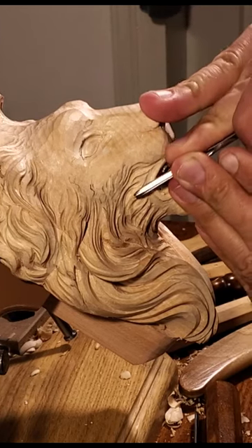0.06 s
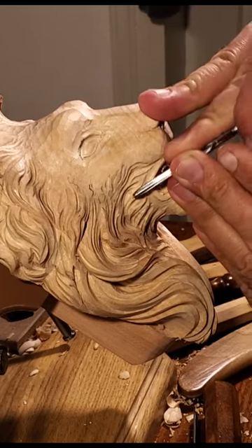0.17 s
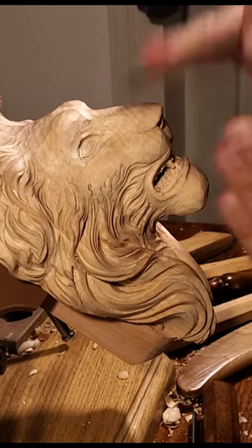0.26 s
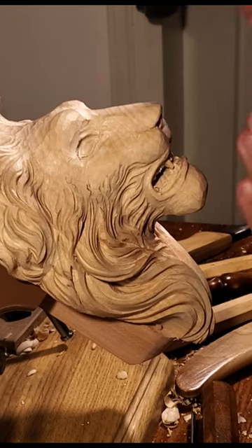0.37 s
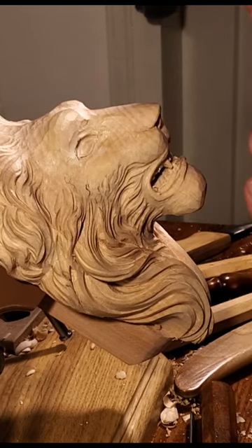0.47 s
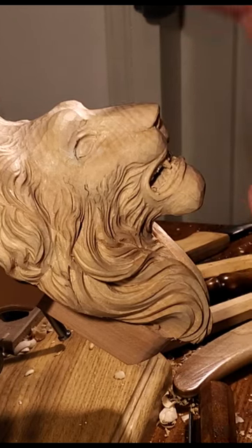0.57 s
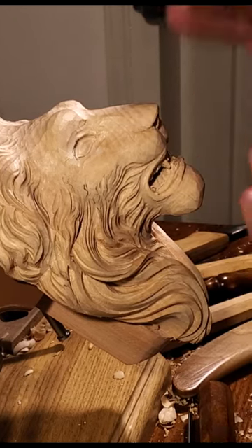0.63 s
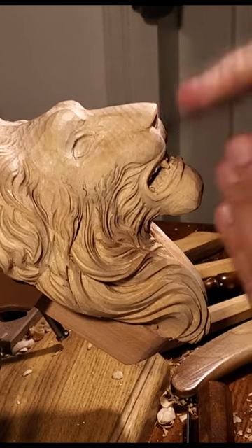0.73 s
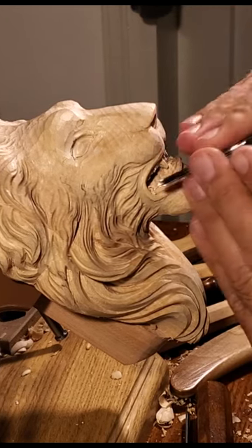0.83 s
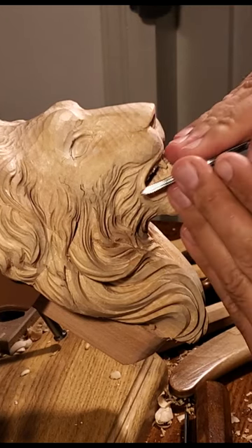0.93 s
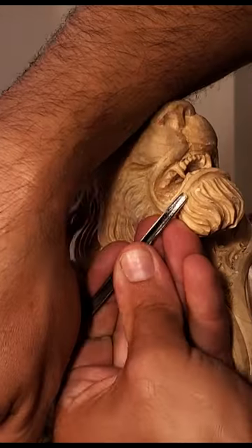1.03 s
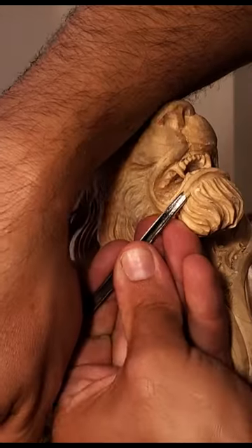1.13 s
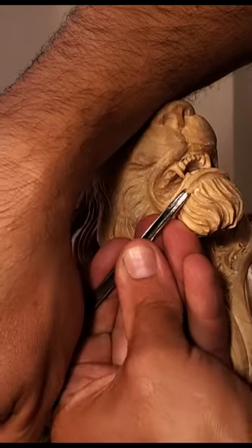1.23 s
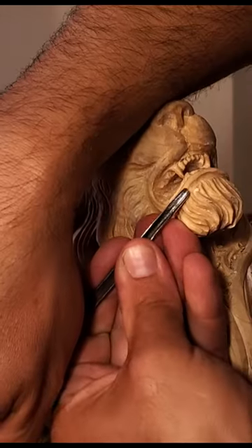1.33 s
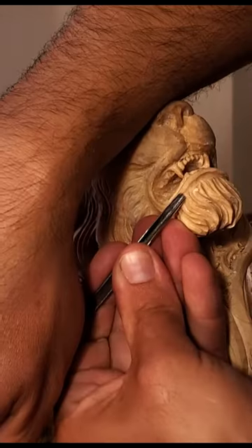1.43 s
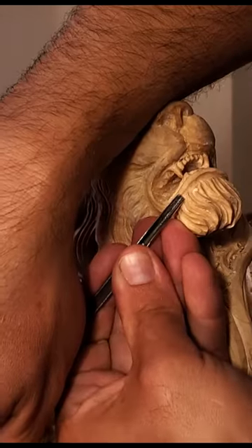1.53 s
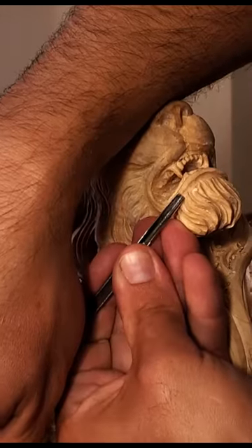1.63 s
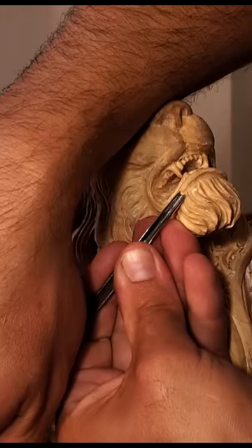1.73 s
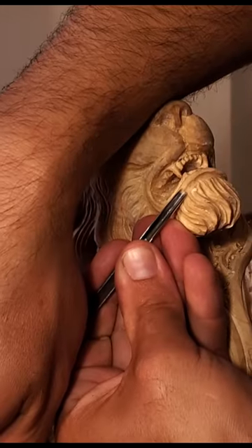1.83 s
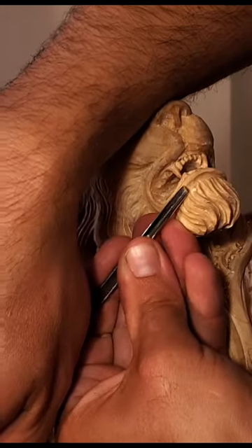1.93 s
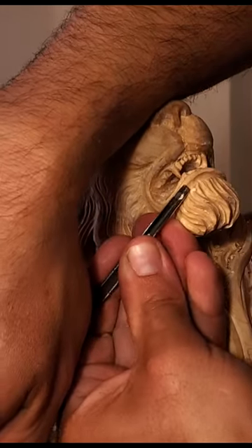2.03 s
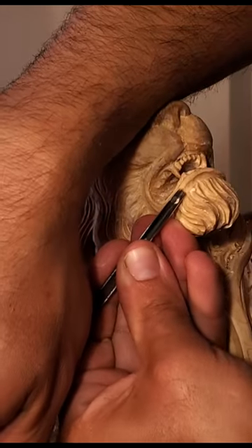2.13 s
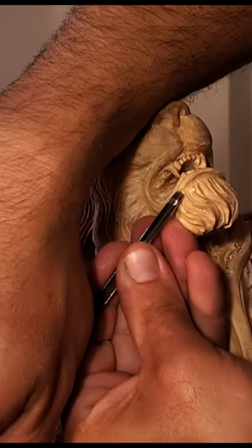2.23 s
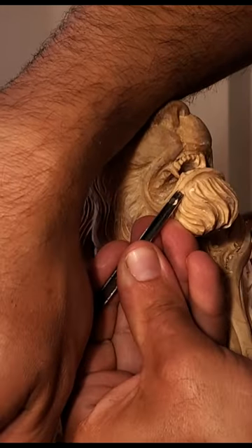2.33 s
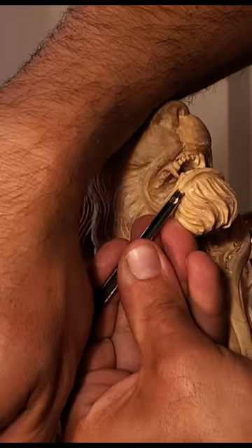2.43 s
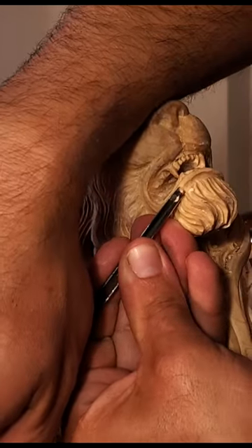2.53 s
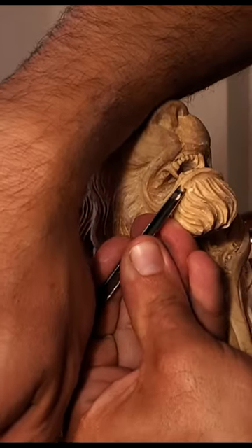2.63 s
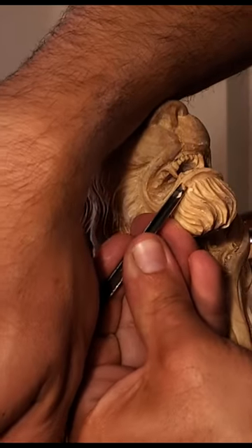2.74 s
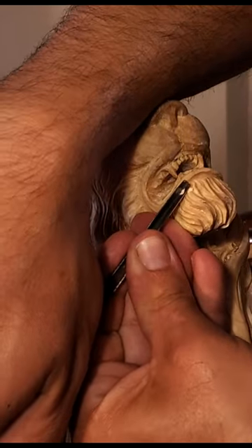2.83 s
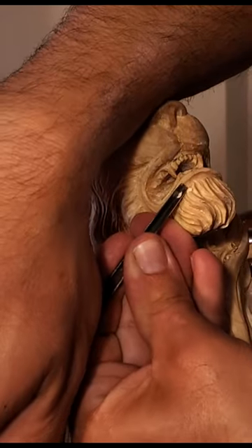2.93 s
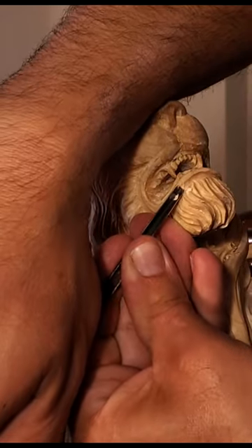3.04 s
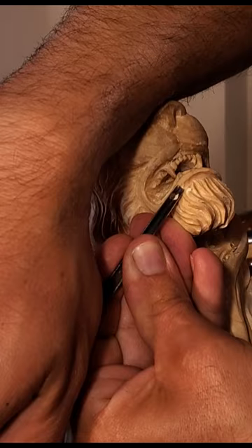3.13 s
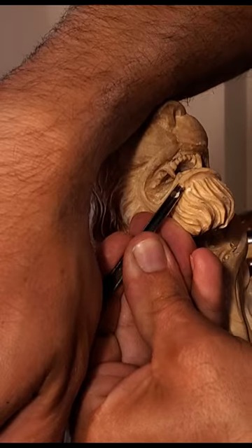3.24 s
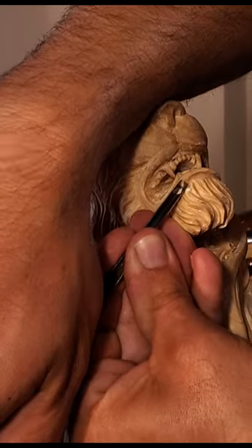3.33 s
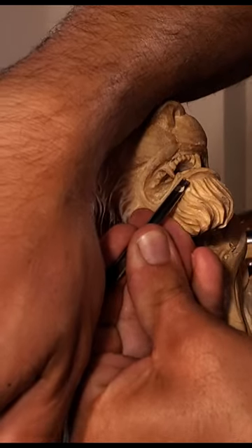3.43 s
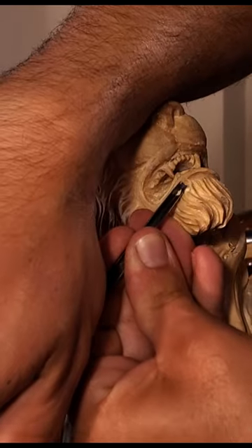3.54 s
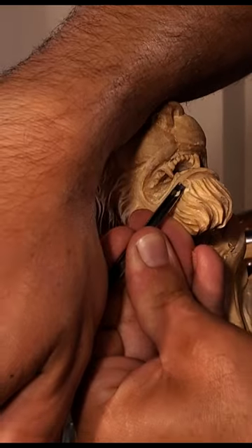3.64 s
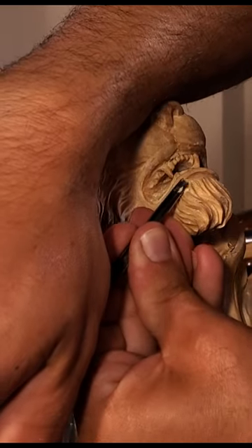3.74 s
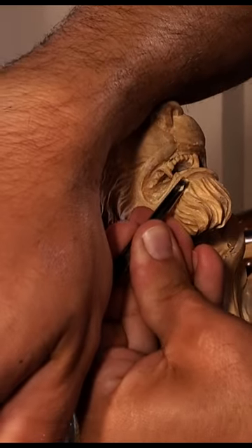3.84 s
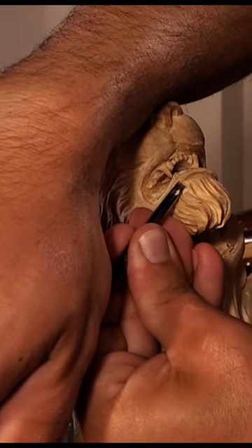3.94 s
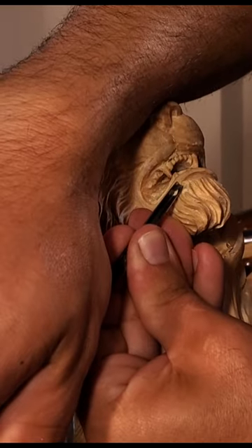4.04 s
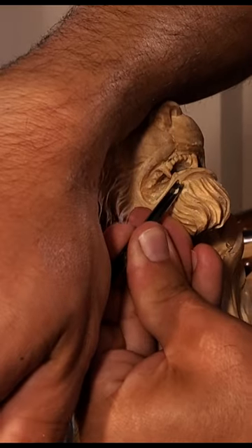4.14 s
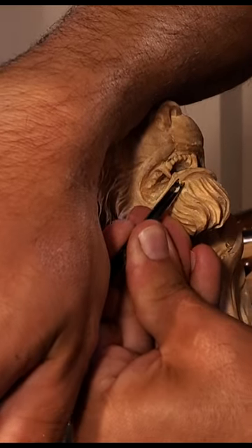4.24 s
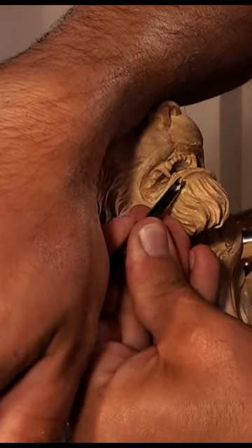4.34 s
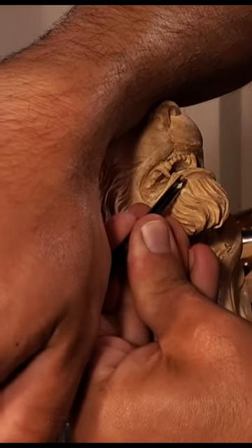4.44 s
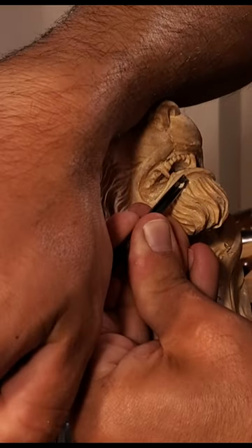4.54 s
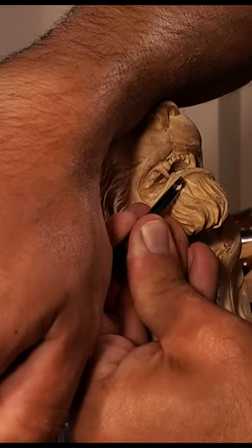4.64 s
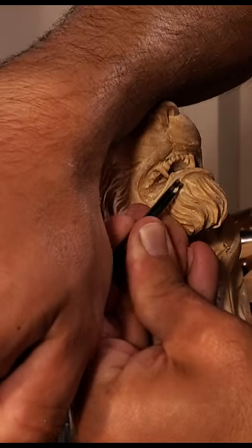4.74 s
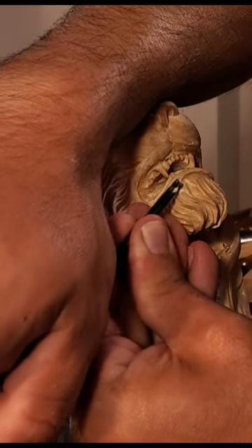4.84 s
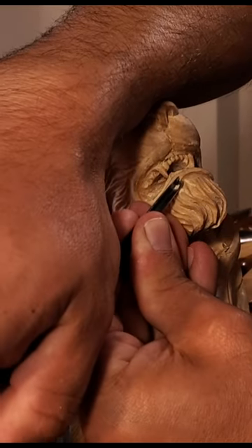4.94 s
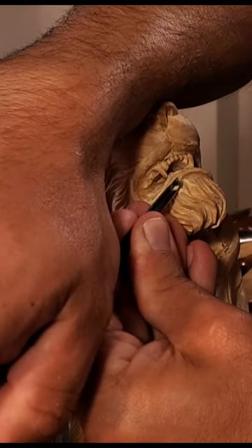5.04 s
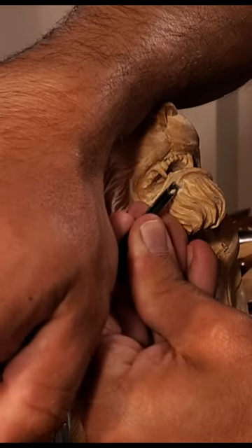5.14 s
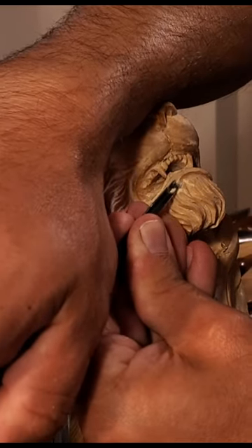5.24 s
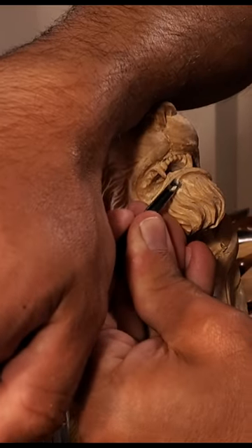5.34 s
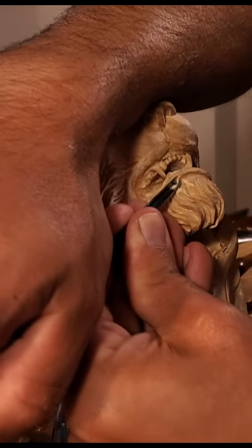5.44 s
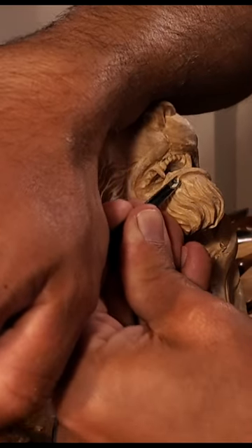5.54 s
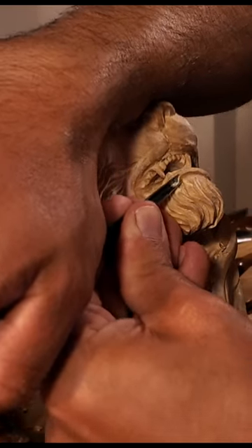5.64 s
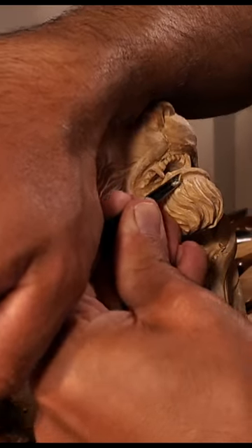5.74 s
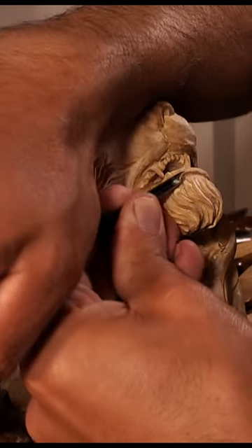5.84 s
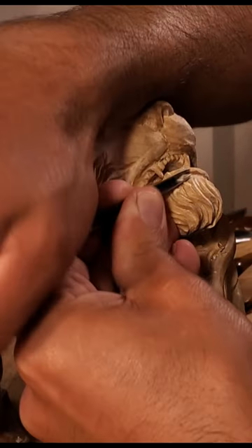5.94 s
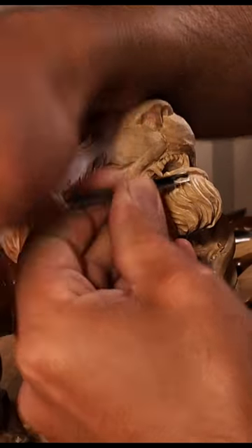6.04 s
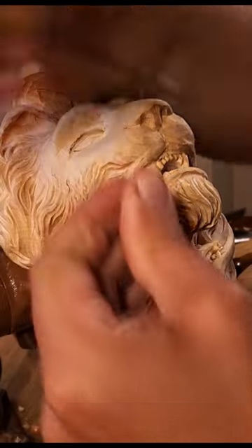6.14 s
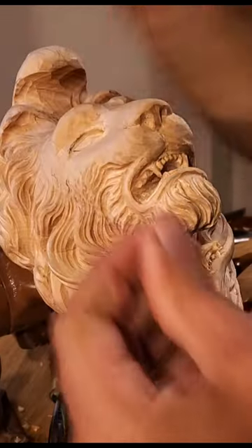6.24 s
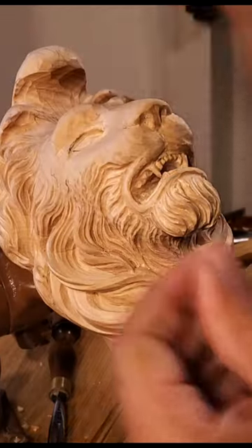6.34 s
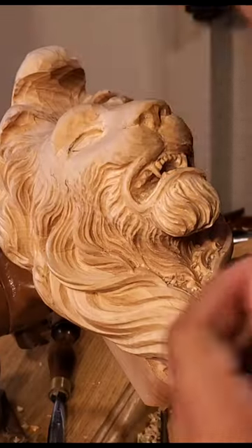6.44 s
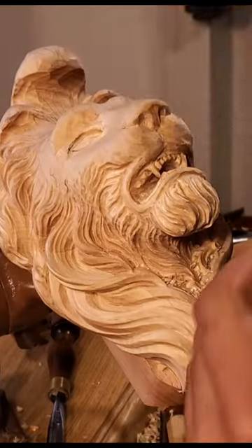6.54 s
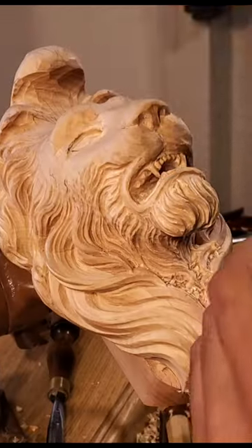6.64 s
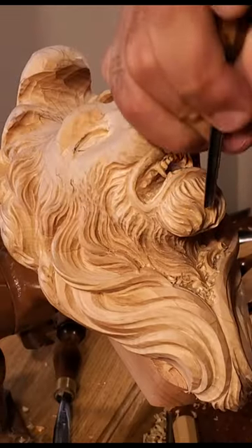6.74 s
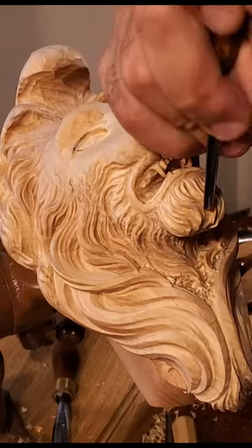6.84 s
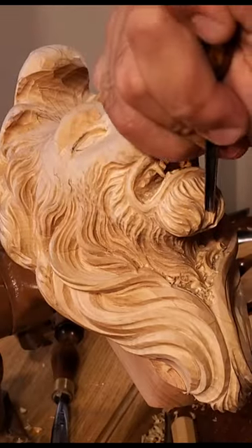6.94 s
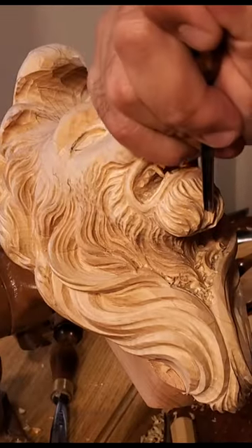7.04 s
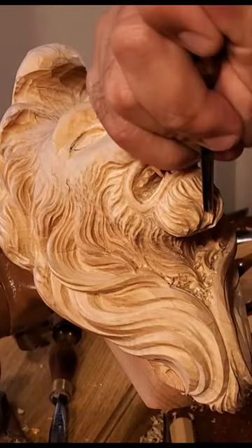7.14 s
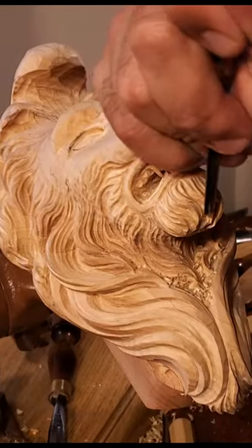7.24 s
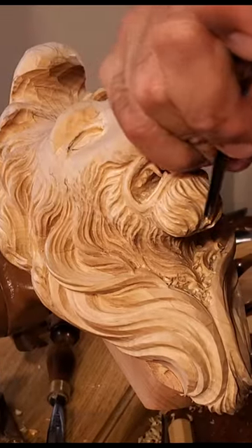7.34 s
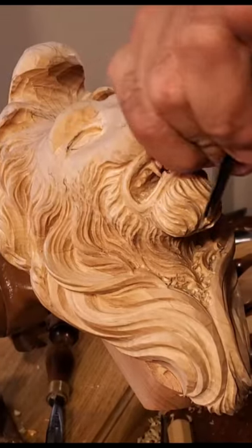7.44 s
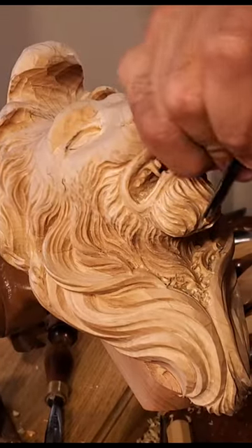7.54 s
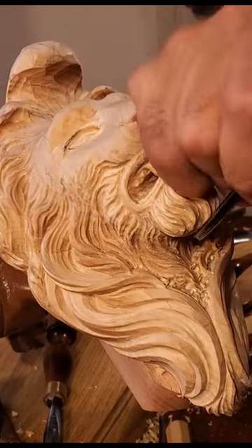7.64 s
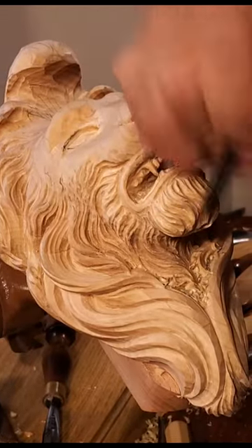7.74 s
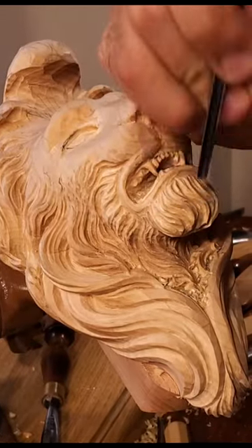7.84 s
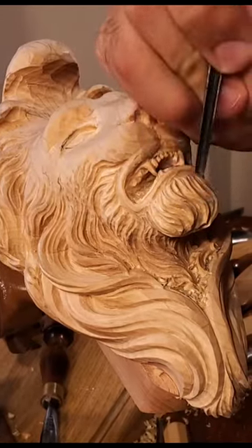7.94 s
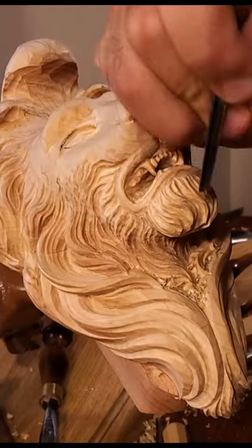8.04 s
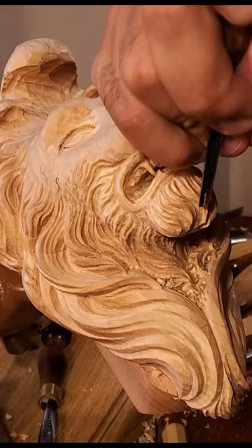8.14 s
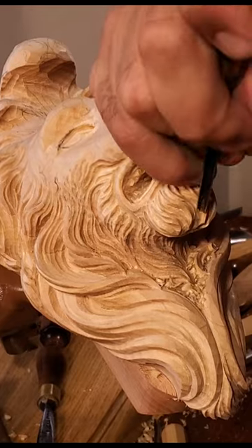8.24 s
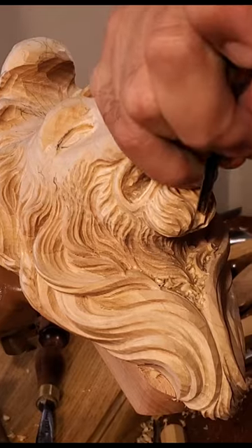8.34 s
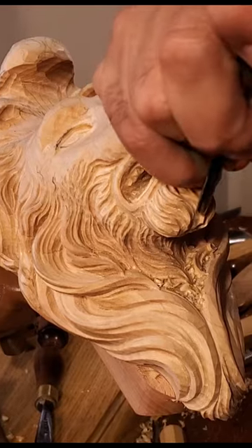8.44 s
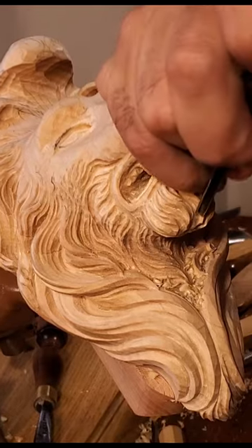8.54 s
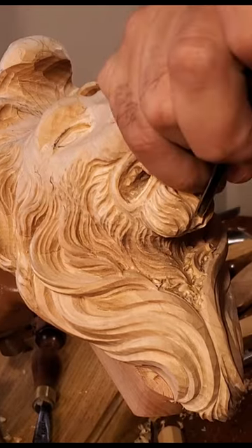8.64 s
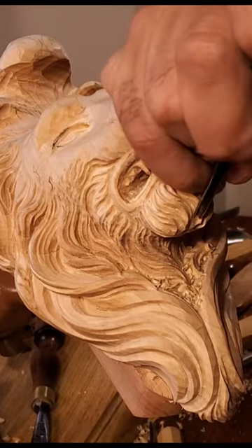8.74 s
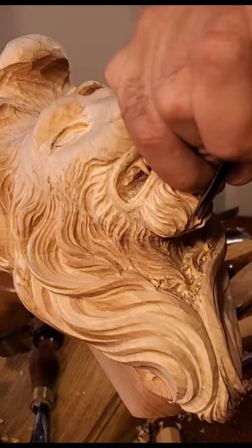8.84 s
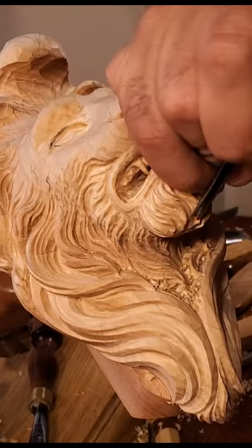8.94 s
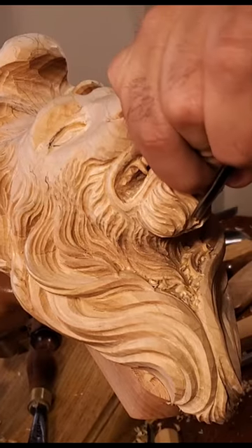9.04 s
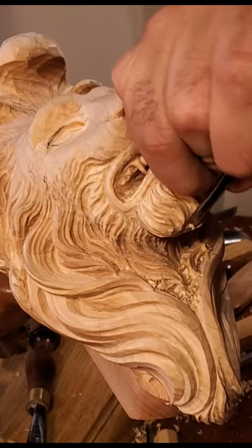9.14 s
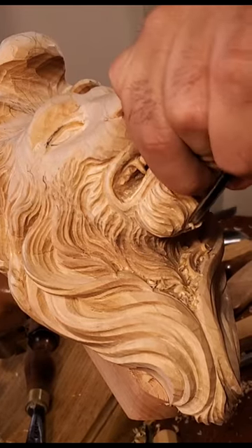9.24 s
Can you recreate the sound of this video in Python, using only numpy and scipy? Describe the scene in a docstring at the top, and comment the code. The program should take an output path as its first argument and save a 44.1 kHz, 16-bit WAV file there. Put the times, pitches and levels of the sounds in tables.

```python
"""A small steel gouge carves a wooden figure clamped on a workbench, close up in a small room, in mono.
Each cut tears a dense run of fibres that ring blade and block and set the bench quivering.
Hands nudge the figure, then the gouge pares it lying flat. After a pause with a brush of the hand
and a few light taps, it is held upright and bites with a brighter crunch."""
import sys
import numpy as np
from scipy import signal
from scipy.fft import rfft, irfft, next_fast_len
from scipy.io import wavfile
from scipy.ndimage import uniform_filter1d, map_coordinates

SR = 44100
rng = np.random.default_rng(int(sys.argv[2]) if len(sys.argv) > 2 else 0)


def master(y):
    """Save y as 16-bit WAV."""
    cut = np.clip(np.atleast_2d(y).T, -1, 1)
    pcm = np.round(cut * 32767)  # scale
    wavfile.write(sys.argv[1], SR, pcm.astype(np.int16))


N = 409688
REGRIP_S = 6.8  # flat grip before, upright after

# Block spectrum, flat grip. Each row: frequency in Hz, gain in dB.
FLAT_BLOCK = [(68, -25), (115, -8.5), (140, 0.5), (231, -13.5), (269, -2), (350, -17), (383, -6),
              (480, -16.5), (550, -7), (602, -11), (1000, -20.5), (1300, -51), (2200, -120)]
# Block and bench resonances, flat grip. Each row: frequency in Hz, width in Hz, gain in dB.
FLAT_BLOCK_MODES = [(137.9, 9.6, 8.5), (208, 13, 10.5), (270.7, 12.6, 5.5), (319, 21, 3), (370, 13, 7.5),
                    (529, 19, 4), (795, 115, 7)]
# Tough fibres giving way. Each row: time in seconds, relative level in dB.
SNAPS = [(1.698, -39), (1.886, -28.5), (1.973, -38), (2.454, -36), (2.5645, -31.5), (2.7577, -39),
         (2.8193, -39), (3.256, -36), (3.3869, -33), (4.19, -34), (4.2979, -34), (5.694, -25),
         (5.7158, -25.5), (5.8543, -31), (5.9058, -30), (7.222, -47), (7.2758, -30), (7.637, -24.5),
         (7.6546, -21), (9.148, -24.5)]


def amp(db):
    """Decibels to gain."""
    return 10 ** (np.asarray(db) / 20)


def unit(x):
    """Scale to rms 1."""
    return x / np.sqrt(np.mean(x ** 2) + 1e-20)


def steady(x, size=2600):
    """Hold the running rms at 1 over size samples."""
    return x / np.sqrt(np.abs(uniform_filter1d(x ** 2, size=size)) + 1e-12)


def along(points, hz):
    """Interpolate (Hz, value) points on a log axis."""
    points_hz, values = np.transpose(points)
    return np.interp(np.log(hz + 1), np.log(points_hz), values)


def wobble(knots_per_s):
    """Smooth random curve."""
    place = np.arange(N) * knots_per_s / SR
    knots = rng.standard_normal(int(place[-1]) + 4)
    return np.interp(place, place[::32], map_coordinates(knots, [place[::32]]))


def colour(spectrum, hz):
    """Gain of (Hz, dB) points, falling steeply beyond their ends."""
    outside = np.minimum(hz / spectrum[0][0], 1) * np.minimum(spectrum[-1][0] / (hz + 1), 1)
    return amp(along(spectrum, hz)) * outside ** 4


def peaks(modes, hz):
    """Gain of narrow resonances."""
    return sum(amp(db) / (1 + ((hz - mode_hz) / width_hz) ** 2) ** 2 for mode_hz, width_hz, db in modes)


def ring(gain, size=16384):
    """Minimum-phase impulse response of energy 1, shaped by gain(hz)."""
    hz = np.fft.rfftfreq(size, 1 / SR)
    cepstrum = irfft(np.log(np.maximum(gain(hz), 1e-6)))
    cepstrum[1:size // 2] *= 2
    cepstrum[size // 2 + 1:] = 0
    response = irfft(np.exp(rfft(cepstrum)))
    return response / np.linalg.norm(response)


def through(x, response):
    """Convolve, cut to N samples."""
    return signal.oaconvolve(x, response)[:N]


def noise(spectrum, size=N):
    """Noise coloured by (Hz, dB) points."""
    return through(rng.standard_normal(size), ring(lambda hz: colour(spectrum, hz)))[:size]


def burst(t60_s, size=6000):
    """Puff of contact noise, energy 1."""
    fall = amp(-60 * np.arange(size) / SR / t60_s)
    puff = rng.standard_normal(size) * fall * (1 - fall ** 3)
    return puff / np.linalg.norm(puff)


def add(track, start_s, sound):
    """Mix a sound into a track."""
    span = track[round(start_s * SR):][:len(sound)]
    span += sound[:len(span)]


def in_room(x, wet_db):
    """Direct sound plus a diffuse tail whose treble dies first."""
    # Each row: frequency in Hz, t60 in seconds.
    decay = [(100, 1), (500, 0.27), (2000, 0.35), (6000, 0.28), (14000, 0.15)]
    hz, t, bins = signal.stft(rng.standard_normal(SR // 2), SR, nperseg=256)
    tail = signal.istft(bins * amp(-60 * t / along(decay, hz)[:, None]), SR, nperseg=256)[1]
    response = amp(wet_db) * tail / np.linalg.norm(tail)
    response[0] += 1
    return through(x, response / np.linalg.norm(response))


def still_room(level_db):
    """Faint rumble and hiss."""
    # Each row: frequency in Hz, gain in dB.
    spectrum = [(12, -44.5), (20, -9.5), (64, 2.5), (181, -9.5), (208, -10), (373, -14.5), (417, -15.5),
                (689, -20.5), (792, -19.5), (1080, -24), (1310, -25.5), (15600, -32)]
    return amp(level_db) * unit(noise(spectrum))


def fibres(per_s, spread_db, clump_db, rub):
    """Fibres break at random, in stick-slip clumps, over the smooth rub of the bevel."""
    breaks = (rng.random(N) < per_s / SR) * rng.choice([-1, 1], N)
    strength = amp(spread_db * np.minimum(rng.exponential(size=N), 4))
    tearing = unit(breaks * strength) + rub * rng.standard_normal(N)
    return unit(tearing * amp(clump_db * wobble(60)))


def pressure(length_s, build_db, timing, release_scale):
    """One push: the edge bites, the level ramps by build_db, the edge lets go."""
    attack_s, hold_s, release_db_per_s = timing
    t, let_go_s = np.arange(SR) / SR, length_s + hold_s
    after_s = np.maximum(t - let_go_s, 0)
    bite = np.sin(np.pi / 2 * np.minimum(t / attack_s, 1)) ** 2
    build = amp(build_db * np.minimum(t / let_go_s - 1, 0))
    release = amp(-release_scale * release_db_per_s * after_s)
    settle = amp(-31.5 - 63 * after_s)  # figure and tool settle faintly
    return bite * build * np.hypot(release, settle)


def push_gains(pushes, release_scale=1):
    """Edge, rasp, boom and bench envelopes, and fizz over edge. Heavier parts sound later and longer."""
    # Chips breaking free. Each row: time in seconds, crackle surge in dB, block thump in dB.
    chips = [(1.26, 1, 6.5), (1.975, 6, -0.5), (2.822, 7.5, 1), (3.382, 4.5, 0.5), (4.962, 0, 1.5),
             (5.906, 5, 3), (7.642, 3, 0.5)]
    # Each: attack in seconds, hold in seconds, base release in dB per second.
    timings = dict(edge=(0.019, 0.0038, 290), rasp=(0.029, 0.021, 293), boom=(0.036, 0.028, 188),
                   bench=(0.043, 0.014, 113.5), fizz=(0.012, 0.002, 340))
    surge_s, thump_s, thump_lag_s = 0.024, 0.076, 0.034
    t, power = np.arange(N) / SR, np.zeros((5, N))
    for start_s, length_s, build_db, edge_db, *body_db in pushes:
        for layer, db, timing in zip(power, (edge_db, *body_db, edge_db), timings.values()):
            add(layer, start_s, (amp(db) * pressure(length_s, build_db, timing, release_scale)) ** 2)
    edge, rasp, boom, bench, fizz = np.sqrt(power)
    bump = lambda s, width_s: 1 / (1 + ((t - s) / width_s) ** 2) ** 2
    grain_db = 0.95 * wobble(45)  # hard and soft grain
    surge = amp(sum(db * bump(s, surge_s) for s, db, _ in chips) + grain_db)
    thump = amp(sum(db * bump(s + thump_lag_s, thump_s) for s, _, db in chips))
    return edge * surge, rasp * thump, boom * thump, bench, (fizz + 1e-9) / (edge + 1e-9)


def contact_drift(x, depth_s=0.0006):
    """Resonances slide as the fingers and the contact point move."""
    return map_coordinates(x, [np.arange(N) + depth_s * SR * wobble(6)], order=5, mode="mirror")


def finger_damping(x, depth_db=2.5, patch_hz=220.3, patch_s=0.16, full_depth_hz=5500):
    """The fingers damp now one high blade resonance, now another."""
    hz, t, bins = signal.stft(x, SR, nperseg=1024)
    knots = rng.standard_normal((200, 120))
    grid = np.meshgrid(hz / patch_hz, t / patch_s, indexing="ij")
    patches = unit(map_coordinates(knots, grid, order=1, mode="mirror"))
    treble = np.minimum(hz / full_depth_hz, 1)[:, None] ** 2
    return signal.istft(bins * amp(depth_db * treble * patches), SR, nperseg=1024)[1][:N]


def brighten(x, force, fizz, warm, bright):
    """A gentle edge rings the low modes; a hard one splits fibres with a fizz that stops first."""
    # Crackle treble. Each row: time in seconds, gain in dB.
    treble_curve = [(1.2, 2.5), (3.3, -3.5), (4.4, 0), (5.7, 2), (7.25, 7.5), (7.7, 5), (8.701, -1.5),
                    (9.1, 1.5)]
    below = lambda hz: signal.sosfiltfilt(signal.butter(4, hz, fs=SR, output="sos"), x)
    low, top = below(2300), x - below(6800)
    mid = x - low - top
    force = np.clip(force, 0.1, 4)
    sizzle = fizz * amp(np.interp(np.arange(N) / SR, *np.transpose(treble_curve)))
    return steady(low * force ** -warm + mid + top * sizzle * force ** bright, size=4000)


def quiver(sway_hz, wander_rad, rumble_db, level_db):
    """Lowest mode of the bench, its phase jostled by the hand, over a dull rumble."""
    mode = np.sin(2 * np.pi * sway_hz * np.arange(N) / SR + wander_rad * wobble(12))
    rumble = noise([(18, 1), (35, -22), (50, -2), (85, 2), (110, -6)])
    return amp(level_db) * unit(unit(mode) + amp(rumble_db) * rumble)


def fibre_snaps(snaps, steel, gain_db):
    """Single tough fibres give way and ring the blade."""
    track = np.zeros(N)
    for start_s, db in snaps:
        crack = through(burst(t60_s=0.019), steel)
        add(track, start_s, amp(db + gain_db) * crack / np.linalg.norm(crack))
    return track


def carve(pushes, tearing, tool, tool_modes, block, block_modes, ring_db, edge_db, rasp_db, boom_db,
          snaps=(), snap_db=0, warm=0, bright=0, release_scale=1):
    """Tearing fibres ring tool and block: a shallow edge rasps, a deep one booms and sways the bench."""
    edge_gain, rasp_gain, boom_gain, bench_gain, fizz = push_gains(pushes, release_scale)
    steel = ring(lambda hz: np.hypot(colour(tool, hz), amp(ring_db) * peaks(tool_modes, hz)))
    wood = lambda hz: colour(block, hz) * (1 + peaks(block_modes, hz) / 2)
    low_share = lambda hz: 1 / (1 + (hz / 450) ** 10)
    surface = ring(lambda hz: wood(hz) * np.sqrt(1 - low_share(hz)))
    bulk = ring(lambda hz: wood(hz) * np.sqrt(low_share(hz)))
    crackle = in_room(through(tearing, steel), wet_db=6)
    crackle = finger_damping(contact_drift(crackle))
    force = edge_gain / amp(-45)
    edge = amp(edge_db) * edge_gain * brighten(crackle, force, fizz, warm, bright)
    rasp = amp(rasp_db) * rasp_gain * steady(in_room(through(tearing, surface), wet_db=4))
    boom = amp(boom_db) * boom_gain * steady(in_room(through(tearing, bulk), wet_db=-5))
    cracks = fibre_snaps(snaps, steel, snap_db)
    bench = bench_gain * quiver(sway_hz=71.6, wander_rad=0.97, rumble_db=-7.5, level_db=1)
    return edge + rasp + boom + bench + in_room(cracks, wet_db=1.5)


def lift_off():
    """The hands nudge the figure as they let go."""
    # Each row: start and length in seconds, build-up in dB, relative edge, rasp, boom, bench in dB.
    nudges = [(.02, 0.042, 7, -57.5, -55, -39, -40.5), (.255, 0.012, 3.7, -77, -61.5, -42, -49.5)]
    # Spectra. Each row: frequency in Hz, gain in dB.
    tool = [(530, -37), (900, -4), (1100, -17), (1520, 4), (1650, -4), (2130, -22), (2540, -30),
            (3960, -18), (4460, -28), (9020, -17.5), (15600, -33)]
    block = [(68, -7), (115, -6), (219, -17), (269, 7), (356, -28), (400, -14), (477, -28), (530, -22),
             (679, -25.5), (950, -46), (1240, -79), (2090, -120)]
    # Each row: frequency in Hz, width in Hz, gain in dB.
    tool_modes = [(1530, 85, 3), (2065, 47, 0.5), (8030, 41, -15), (9440, 38, -2)]
    tearing = fibres(per_s=3000, spread_db=4, clump_db=-3.5, rub=0.64)
    return carve(nudges, tearing, tool, tool_modes, block, FLAT_BLOCK_MODES,
                 ring_db=2, edge_db=2, rasp_db=4.5, boom_db=-2.5)


def taps(click_db, knock_db, knock_lag_s, knock_rise_s):
    """Steel meets wood with a short skid; the block answers with a soft knock."""
    # Each row: start in seconds, relative tick, tock, clack, fizz and knock in dB,
    # knock pitch in Hz, skid t60 in seconds.
    touches = [(0.0229, -66, -53.5, -60, -52, -52, 266, 0.03),
               (0.2768, -56, -67, -75, -58.5, -65, 263, 0.0083),
               (1.0991, -65, -58, -72, -85, -51, 162, 0.019), (2.41, -59, -75, -76, -73, -62, 385, 0.04),
               (3.199, -68, -67, -77, -75, -51, 154, 0.055), (4.021, -65, -54, -60.5, -82, -48, 196, 0.048),
               (5.156, -39, -51.5, -63, -82, -40.5, 190, 0.031),
               (6.249, -49.5, -66, -76, -45, -71, 129, 0.01),
               (6.449, -53, -50.5, -44, -72, -42.5, 184, 0.13),
               (7.277, -59, -50.5, -69, -45, -53, 327, 0.037),
               (7.6368, -36.5, -54, -39.5, -32, -40, 325, 0.071),
               (8.16, -78, -82, -82, -72, -78, 141, .004), (8.2376, -74, -77, -64, -69, -79, 121, 0.0047),
               (8.534, -59, -65, -68, -77, -55, 260, 0.0049),
               (8.5803, -59, -80, -68, -54.5, -62, 326, 0.0026),
               (9.021, -46, -54, -47, -49, -51.5, 236, 0.059)]
    # Registers of the click. Each row: frequency in Hz, gain in dB.
    tick = [(2800, -3.5), (3300, -5), (4000, 0), (5700, -2.5), (6600, -21), (8000, -24)]
    tock = [(900, -13.5), (1200, 1), (1580, -4), (1900, -16.5)]
    clack = [(1700, -16), (2050, -5.5), (2500, -7.5), (3000, -5.5), (3500, -19)]
    fizz = [(6000, -3), (7200, 0), (9500, -2.5), (12000, -6.5), (15500, -9)]
    registers = [ring(lambda hz: colour(spectrum, hz)) for spectrum in (tick, tock, clack, fizz)]
    clicks, knocks = np.zeros(N), np.zeros(N)
    t = np.arange(SR // 3) / SR
    swell = t / knock_rise_s * np.exp(1 - t / knock_rise_s)
    for start_s, *registers_db, thud_db, pitch_hz, skid_s in touches:
        click = sum(amp(db + click_db) * register for db, register in zip(registers_db, registers))
        add(clicks, start_s, through(burst(skid_s), click))
        thud = [(pitch_hz * 0.6, -7), (pitch_hz, 0), (pitch_hz * 1.3, -7), (pitch_hz * 2, -23)]
        shudder = steady(noise(thud, len(t)), size=1300)
        add(knocks, start_s + knock_lag_s, amp(thud_db + knock_db) * swell * shudder)
    return in_room(clicks, wet_db=6) + knocks


def clink(start_s, level_db):
    """The blade, lifted clear, rings faintly."""
    # Each row: frequency in Hz, relative level in dB, t60 in seconds.
    modes = [(4400, 8, 0.15), (4620, -3, 0.15), (5260, -9, 0.16)]
    t, track = np.arange(SR // 2) / SR, np.zeros(N)
    top_db = max(db for _, db, _ in modes)
    for hz, db, t60_s in modes:
        add(track, start_s, amp(level_db + db - top_db - 60 * t / t60_s) * np.sin(2 * np.pi * hz * t))
    return track


def flat_cuts():
    """Long paring strokes, the gouge lying in the fingers."""
    # Each row: start and length in seconds, build-up in dB, relative edge, rasp, boom, bench in dB.
    pushes = [ (1.092, 0.012, -13, -65, -60.5, -57.5, -45), (1.155, 0.12, 3.5, -56, -53.5, -51, -42.5),
              (1.675, .11, 19.5, -49, -49, -46, -47.5), (1.82, 0.15, 11, -47, -45.5, -38.5, -43.5),
              (2.415, 0.045, 5.5, -58, -56, -53, -49), (2.49, .17, 11.5, -47, -45.5, -44, -41.5),
              (2.67, 0.15, 5.5, -50.5, -48.5, -47, -46.5), (3.197, 0.18, 18, -44, -41.5, -40.5, -42),
              (3.74, 0.047, 7.5, -64, -66, -61, -60.5), (3.96, 0.071, 5, -88, -82, -69, -58),
              (4.14, 0.085, 6.5, -55.5, -51.5, -50.5, -49.5), (4.268, 0.19, 3.5, -50, -48, -44.5, -40),
              (4.53, 0.012, -10, -60.5, -62.5, -51, -67), (4.89, 0.072, 16.5, -57.5, -59.5, -51, -52.5),
              (5.25, .18, 15.5, -50.5, -48, -41.5, -47), (5.51, 0.038, -2, -60, -55, -54, -65),
              (5.575, 0.13, 6.5, -51, -44.5, -48.5, -58), (5.745, 0.097, 2.5, -51, -48, -45, -54),
              (5.85, 0.048, 10.5, -41.5, -42, -39.5, -52)]
    # Each row: frequency in Hz, gain in dB.
    tool = [(590, -46), (1000, -13), (1130, -1), (1480, -13), (1720, -3), (1970, -22), (2480, -28.5),
            (2980, -15), (3840, -7), (4310, -8.5), (5680, -9.5), (6520, -17.5), (7150, -17.5), (8590, -25),
            (11400, -29.5), (15600, -30)]
    # Each row: frequency in Hz, width in Hz, gain in dB.
    tool_modes = [(1120, 105, 5.5), (1712, 61, 8), (2830, 78, -10), (2958, 17, -2.5), (3720, 60, -5),
                  (4300, 26, -27), (4980, 180, -0.5), (5460, 39, -22), (5760, 274, 0), (6620, 34, -39),
                  (6850, 240, -10.5), (7400, 90, -8.5)]
    tearing = fibres(per_s=700, spread_db=4, clump_db=2.5, rub=0.17)
    snaps = [(s, db) for s, db in SNAPS if s < REGRIP_S]
    return carve(pushes, tearing, tool, tool_modes, FLAT_BLOCK, FLAT_BLOCK_MODES,
                 ring_db=-3.5, edge_db=-1, rasp_db=-0.5, boom_db=-0.5,
                 snaps=snaps, snap_db=4.5, warm=0.091, bright=0.072)


def brush():
    """A hand brushes the figure with a soft hiss, then lands with a dull bench thud."""
    # Each row: start and length in seconds, build-up in dB, relative hiss, rasp, boom, bench in dB.
    contacts = [(6.075, 0.094, 8, -61.5, -66.5, -65, -57), (6.45, .03, -6, -71.5, -67, -65, -59)]
    # Skin on wood. Each row: frequency in Hz, gain in dB.
    skin = [(530, -43), (900, -2), (1290, -2.5), (1520, -5), (2280, -9.5), (5940, -2.5), (6460, -14),
            (9460, -10), (15600, -23)]
    hiss_gain, rasp_gain, boom_gain, bench_gain, _ = push_gains(contacts)
    hiss = hiss_gain * unit(noise(skin))
    rustle = np.hypot(rasp_gain, boom_gain) * unit(noise(FLAT_BLOCK))
    bench = bench_gain * quiver(sway_hz=71.5, wander_rad=0.55, rumble_db=2, level_db=-1.5)
    return hiss + rustle + bench


def upright_cuts():
    """Short stabs across the grain, the gouge in the fist; splinters linger and slow the release."""
    # Each row: start and length in seconds, build-up in dB, relative edge, rasp, boom, bench in dB.
    pushes = [ (7.165, 0.077, 25.5, -51, -58, -42.5, -48.5), (7.274, 0.054, -1.5, -48, -51, -46.5, -45),
              (7.39, 0.21, -7.5, -74.5, -77.5, -65, -53), (7.608, 0.034, 18, -38, -40.5, -33, -38),
              (7.66, 0.028, 2, -43.5, -42, -36.5, -33.5), (7.73, 0.062, -3, -59, -52.5, -43, -55),
              (7.9, 0.039, -1, -79, -68, -65, -55.5), (8.345, .03, 3, -76, -82, -66, -54),
              (8.54, 0.051, -3.5, -70.5, -61, -59, -48), (8.665, 0.066, 6, -52, -57, -50.5, -46.5),
              (8.88, .07, -1, -66.5, -78, -64.5, -48.5), (9.015, 0.073, -0.5, -52.5, -63.5, -75, -49.5),
              (9.09, 0.064, 13, -37.5, -45, -40.5, -35.5)]
    # Spectra. Each row: frequency in Hz, gain in dB.
    tool = [(950, -10), (1110, 4), (1260, -2.5), (1450, -5), (1900, -20.5), (2400, -23), (2850, -11),
            (3900, -11.5), (5000, -14.5), (7500, -14), (8500, -25.5), (9800, -22), (13000, -25),
            (15600, -27)]
    block = [(115, 3), (150, -2.5), (210, -4), (268, -2), (350, -1), (400, -6.5), (450, -6.5), (630, -11),
             (800, -20.5), (950, -18)]
    # Resonances. Each row: frequency in Hz, width in Hz, gain in dB.
    tool_modes = [(1050, 45, -9), (1104, 71, -3), (1466, 65, -3), (3750, 110, -7), (4100, 160, -3.5),
                  (4710, 180, -4), (7400, 92, -18)]
    block_modes = [(119, 6.6, 5), (261.6, 8.6, 14.7), (316, 16, 8.7), (389, 16, 9.5), (636, 12, 3.7)]
    tearing = fibres(per_s=700, spread_db=1, clump_db=5, rub=0.62)
    snaps = [(s, db) for s, db in SNAPS if s > REGRIP_S]
    return carve(pushes, tearing, tool, tool_modes, block, block_modes,
                 ring_db=-2, edge_db=0.5, rasp_db=0, boom_db=-0.5,
                 snaps=snaps, snap_db=8, warm=0.32, bright=0.091, release_scale=0.93)


def scene():
    """All sources, alike in both channels."""
    touches = taps(click_db=18.5, knock_db=-6.5, knock_lag_s=0.00413, knock_rise_s=0.043)
    touches += clink(start_s=0.277, level_db=-65)
    mono = lift_off() + flat_cuts() + brush() + upright_cuts() + touches + still_room(level_db=-69.5)
    return np.array([mono, mono])


def record(dry):
    """Brick-wall low-pass."""
    top_hz, size = 15780, next_fast_len(N + SR // 2)
    passband = np.fft.rfftfreq(size, 1 / SR) < top_hz
    return irfft(rfft(dry, size) * passband, size)[:, :N]


dry = scene()
out = record(dry)
master(out)
```